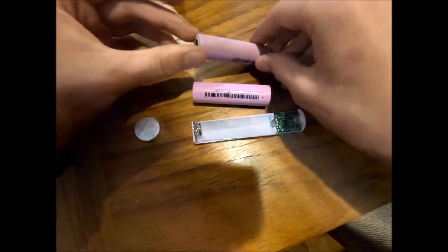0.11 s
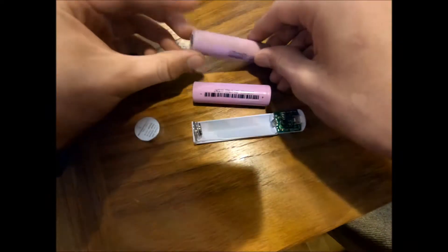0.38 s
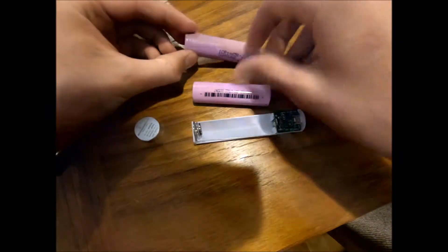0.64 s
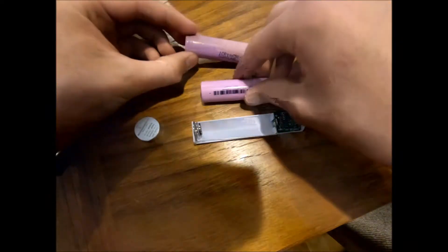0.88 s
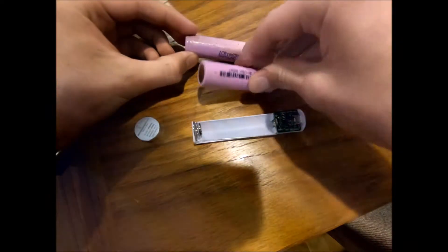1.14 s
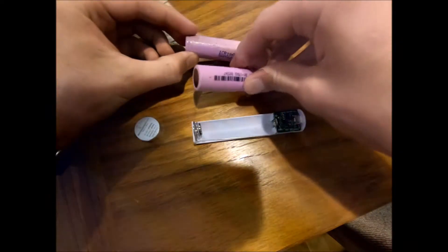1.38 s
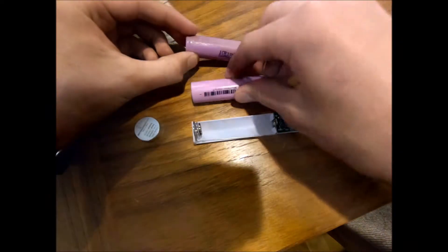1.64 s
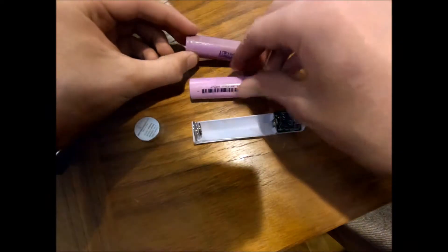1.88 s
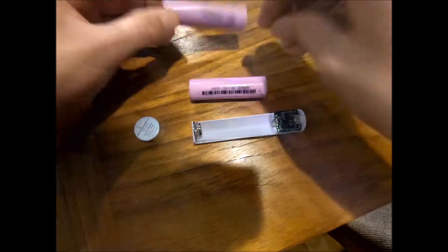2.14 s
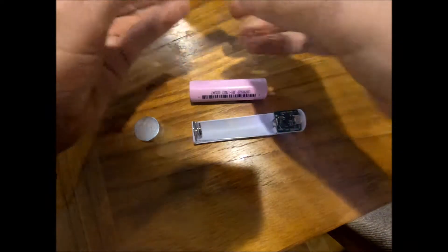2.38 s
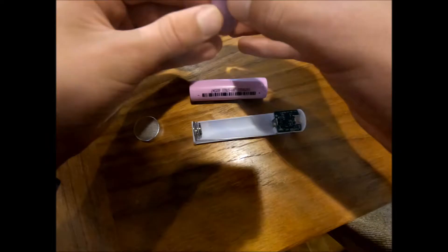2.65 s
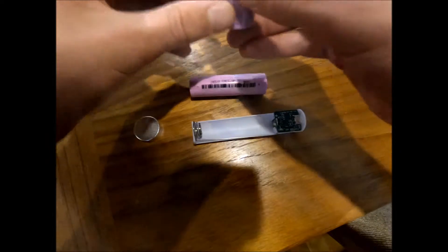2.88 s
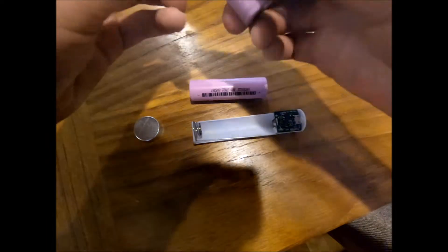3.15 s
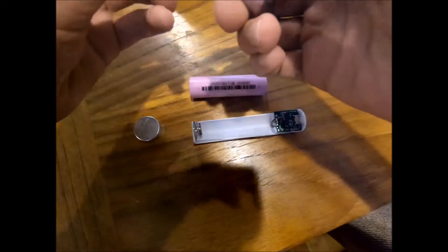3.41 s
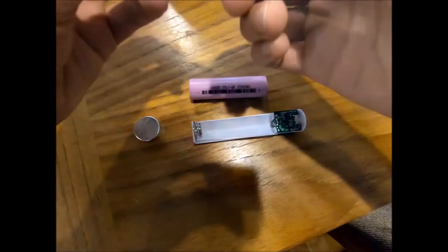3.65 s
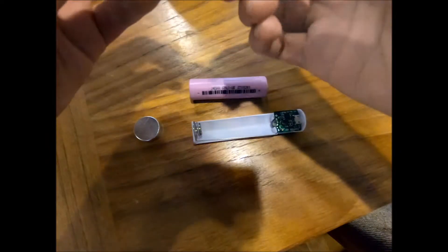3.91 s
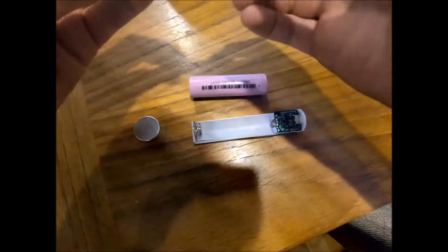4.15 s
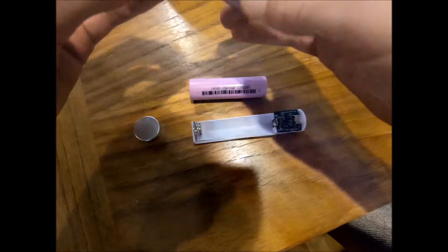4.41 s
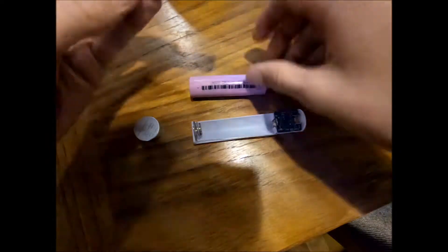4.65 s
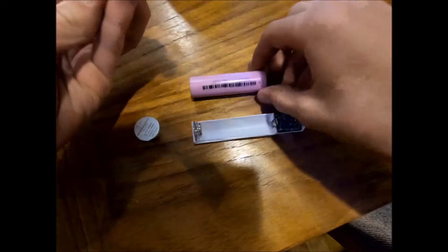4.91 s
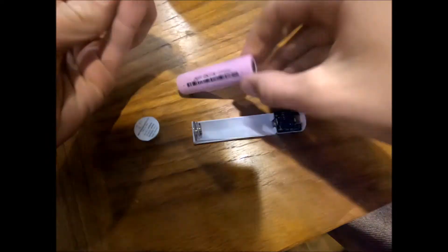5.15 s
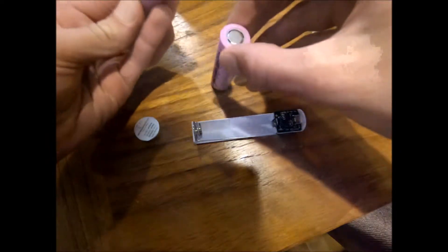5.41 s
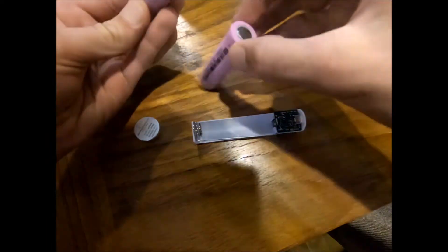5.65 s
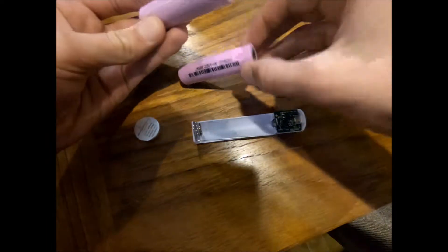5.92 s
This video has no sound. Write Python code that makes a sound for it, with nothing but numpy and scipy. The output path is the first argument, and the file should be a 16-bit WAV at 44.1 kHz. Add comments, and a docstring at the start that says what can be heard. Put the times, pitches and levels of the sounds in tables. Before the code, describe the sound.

Two hard knocks of metal cells on a wooden table, with dull bumps, skin rubbing and faint rustling between, close up in a small room.

```python
"""Metal cells handled on a wooden table

Metal cells knock on a wooden table in a small room, close to a two-port microphone on a stand.
Knocks reach both ports through the air: snap, ringing table modes, noisy clatter and a metal tick, with room echoes.
Bumps, thuds, footsteps and dragging hands shake the stand: decaying modes, tones and noise, near opposite in the ports.
Fingers rustle in grainy noise strokes, the table top drones in low noise, and microphone hiss lies under it all."""
import sys
import numpy as np
from scipy import signal
from scipy.fft import rfft, irfft
from scipy.io import wavfile
from scipy.ndimage import uniform_filter1d

SR = 44100
rng = np.random.default_rng(int(sys.argv[2]) if len(sys.argv) > 2 else 0)


def master(y):
    """Save y as 16-bit WAV."""
    cut = np.clip(np.atleast_2d(y).T, -1, 1)
    pcm = np.round(cut * 32767)  # scale
    wavfile.write(sys.argv[1], SR, pcm.astype(np.int16))


def field_ratio(decibels):
    """Amplitude ratio for a level in dB (20 dB per decade); scalars and array-likes work."""
    return 10 ** (np.asarray(decibels, dtype=float) / 20)


N = 266364
T = np.arange(N) / SR
T_HALF = T[:SR // 2]  # the first half second
MID_SIDE = np.array([[1], [-1]])  # sign of the side signal in left and right


def colour(x, points):
    """Shape a spectrum by (Hz, dB) points, interpolated over log frequency."""
    hz, db = np.transpose(points)
    f = np.maximum(np.fft.rfftfreq(N, 1 / SR), 1)
    gain = field_ratio(np.interp(np.log(f), np.log(hz), db))
    return irfft(rfft(x) * gain, N)


def noise(points, channels=1):
    """Coloured noise of rms 1."""
    x = colour(rng.standard_normal((channels, N)), points)
    return x / x.std()


def walk(rate_hz):
    """Random levels held 1 / rate s and slewed twice; spread near 1."""
    k = int(SR / rate_hz)
    held = np.repeat(rng.standard_normal(N // k + 1), k)
    return 1.3 * uniform_filter1d(uniform_filter1d(held, k), k)[:N]


def add(track, s, sound):
    """Mix a sound into a track at s seconds."""
    i = int(s * SR)
    track[..., i:i + sound.shape[-1]] += sound[..., :N - i]


def decay(t60_s):
    """Exponential decay by 60 dB in t60_s."""
    return np.exp(-np.log(1000) * T_HALF / t60_s)


def ring(hz, t60_s, phase=0.):
    """One decaying mode."""
    return decay(t60_s) * np.sin(2 * np.pi * hz * T_HALF + phase)


def hums(table, edge_cycles, rough_db, waver, skirt_rad, rough_hz=60):
    """Tones swell, hold unevenly and fade over a few cycles; pitch drift and phase wobble blur them."""
    out = np.zeros(N)
    drift, slip_rad = 1 + waver * walk(40), skirt_rad * walk(300)
    roughs = [field_ratio(rough_db * walk(rough_hz)) for _ in range(3)]  # neighbouring tones flicker apart
    for k, ((s, length_s, hz, db), turn) in enumerate(zip(table, rng.random(len(table)))):
        edge_s = edge_cycles / hz
        i = max(int((s - 2 * edge_s) * SR), 0)
        t = T[i:i + int((length_s + 6 * edge_s) * SR)]
        span = slice(i, i + len(t))
        before = np.minimum(t - s - edge_s / 2, 0) / edge_s
        after = np.maximum(t - s - length_s + edge_s / 2, 0) / (2.1 * edge_s)
        shape = np.exp(-before ** 2 - after ** 2)
        cycles = np.cumsum(hz * drift[span]) / SR + turn
        tone = np.sin(2 * np.pi * cycles + slip_rad[span])
        out[span] += field_ratio(db) * shape * tone * roughs[k % len(roughs)][span]
    return out


# Microphone hiss spectrum. Each row: frequency in Hz, relative density in dB per Hz.
HISS_SPECTRUM = [(12, -36.5), (20, -0.5), (40, 0.5), (96, -22), (156, 1.5), (262, -15.5), (400, -18.5),
                 (800, -17.5), (1250, -23.5), (1900, -28), (2800, -33), (4500, -36.5), (7000, -34),
                 (8200, -37.5), (12000, -39), (15700, -48.5)]


def hiss(level_db=-64.5):
    """Steady coloured noise, independent in the two ports."""
    return field_ratio(level_db) * noise(HISS_SPECTRUM, channels=2)


# Hands dragging on the table. Each row: time in seconds, level in dB ahead of the drag gain.
HAND_DRAG = [(0, -70.5), (.5, -66), (.72, -67.5), (1.2, -64), (1.65, -59), (1.95, -66), (2.14, -60.5),
             (2.3, -69.5), (2.7, -83.5), (3.15, -62.5), (3.3, -70.5), (3.9, -70), (4.17, -62), (4.4, -66.5),
             (4.9, -65.5), (5.2, -62), (5.4, -63.5), (5.55, -65.5), (5.78, -71), (5.95, -57), (6.04, -66)]
# Stand tremor spectrum. Each row: frequency in Hz, relative density in dB per Hz.
RUMBLE_SPECTRUM = [(12, -34.5), (20, -14), (65, -10.5), (100, -22.5), (155, -8.5), (216, -13.5),
                   (310, -11.5), (350, -2.5), (430, -5), (520, -10.5), (610, -6), (850, -3.5),
                   (1100, -20.5), (1800, -23.5), (3350, -54.5), (9000, -90.5)]


def rumble(steady_db=-72, drag_gain_db=6):
    """The stand never rests: a steady tremor plus the drag of hands, both flickering."""
    drag_db = np.interp(T, *np.transpose(HAND_DRAG)) + drag_gain_db + 2.5 * walk(25)
    steady = field_ratio(steady_db + 1.1 * walk(24)) * noise(RUMBLE_SPECTRUM)[0]
    return steady + field_ratio(drag_db) * noise(RUMBLE_SPECTRUM)[0]


# Table top drone spectrum. Each row: frequency in Hz, relative density in dB per Hz.
DRONE_SPECTRUM = [(60, -20), (110, -3), (160, 0.), (230, -3), (330, -10), (500, -30), (1000, -46),
                  (8000, -95)]
# Blows and leaning hands. Each row: time in seconds, rise in seconds, hold in seconds, level in dB.
HAND_LEANS = [(0.544, .004, 0.013, -44.5), (1.674, .002, 0.024, -36), (1.984, .008, .02, -55.5),
              (2.062, 0.015, 0.035, -56), (2.166, .02, .01, -58.5), (2.598, .03, 0.0093, -68),
              (2.913, 0.028, 0.037, -64.5), (3.138, .004, 0.0084, -67), (3.736, .03, 0.0072, -64),
              (3.998, .002, 0.0092, -38), (4.155, .03, 0.031, -58), (4.967, 0.0085, 0.024, -60),
              (5.27, .03, .08, -47.5), (5.407, .015, 0.024, -40), (5.753, .002, .045, -31.5),
              (5.96, .03, 0.04, -52.5)]


def drone(rest_db=-66, fall_db_per_s=249.5, right_db=2.5):
    """The table top drones under blows and leaning hands, differently at each port."""
    size = field_ratio(rest_db)
    for s, rise_s, hold_s, db in HAND_LEANS:
        rise = np.exp(-(np.maximum(s - T, 0) / rise_s) ** 2)
        fall = field_ratio(db - fall_db_per_s * np.maximum(T - s - hold_s, 0))
        size = size + fall * rise
    flicker = field_ratio(2. * walk(30))
    return size * flicker * noise(DRONE_SPECTRUM, channels=2) * field_ratio(np.array([[0], [right_db]]))


# Footsteps nearby, felt through the floor. Each row: time in seconds, level in dB.
FOOTSTEPS = [(1.345, -49), (2.807, -38), (3.292, -44), (3.785, -31.5), (4.278, -45), (4.757, -40.5),
             (5.25, -39), (5.728, -49)]
# Wrists and knuckles on the table. Each row: time in seconds, level in dB.
WRIST_THUDS = [(0.568, -61.5), (1.684, -49.5), (2.038, -53), (2.101, -52), (2.179, -44.5), (4.08, -29),
               (5.285, -44), (5.393, -51.5), (5.442, -40), (5.805, -45)]


def thuds(step_hz=66, step_s=.036, rebound_s=.068, rebound_db=-10, wrist_hz=73.6, wrist_s=.03):
    """Every step thuds and rebounds at the floor's pitch; wrists thud shorter and a little higher."""
    steps = [(s, step_s, step_hz, db) for s, db in FOOTSTEPS]
    rebounds = [(s + rebound_s, step_s, step_hz, db + rebound_db) for s, db in FOOTSTEPS]
    wrists = [(s, wrist_s, wrist_hz, db) for s, db in WRIST_THUDS]
    return hums(steps + rebounds + wrists, edge_cycles=0.61, rough_db=1.0, waver=0.017, skirt_rad=.05)


# Longer drags of skin. Each row: start in seconds, length in seconds, frequency in Hz, level in dB.
SKIN_DRAGS = [(.82, 0.064, 763, -50.5), (.78, .2, 440, -55.5), (.87, .11, 518.6, -50.5),
              (1.12, 0.62, 594.4, -56.5), (1.2, 0.59, 429.7, -50.5), (1.75, 0.1, 440, -50),
              (1.98, .25, 443, -53.5), (3.5, .16, 420, -53.5), (4.2, 0.121, 437, -53),
              (4.99, 0.14, 468, -56.5), (5.24, 0.11, 469, -46), (5.38, 0.074, 462.5, -43),
              (5.86, 0.11, 481, -41), (5.9, .07, 597, -47.5)]


def drags():
    """The stand sings on and off as skin sticks and slips: rough tones with blurred pitch."""
    return hums(SKIN_DRAGS, edge_cycles=6.0, rough_db=3.7, waver=.035, skirt_rad=1.03, rough_hz=28)


# Jerks of a hand or cell. Each row: start in seconds, length in seconds, frequency in Hz, level in dB.
STAND_SHUDDERS = [(0.376, 0.089, 160, -55.5), (0.55, 0.145, 170, -42), (0.948, 0.035, 481, -42),
                  (1.05, 0.023, 660, -45), (1.71, 0.12, 167, -41.5), (2.045, 0.023, 199, -35),
                  (2.089, 0.03, 628, -43), (2.09, 0.036, 202, -41), (2.165, 0.028, 210, -42),
                  (3.143, 0.038, 193, -49), (3.607, 0.062, 641, -46), (4.982, 0.016, 227, -45),
                  (5.113, 0.047, 472, -44), (5.273, 0.065, 199, -39.5), (5.317, 0.07, 170.5, -43),
                  (5.431, 0.038, 199, -33), (5.551, 0.017, 193, -46.5), (5.774, 0.08, 480, -19.5),
                  (5.784, 0.029, 244, -31), (5.83, 0.062, 215, -34), (5.988, 0.029, 230, -44)]


def shudders():
    """The stand hums briefly when a hand or cell jerks on the table."""
    return hums(STAND_SHUDDERS, edge_cycles=3.0, rough_db=0.84, waver=.015, skirt_rad=0.53)


# Jolts to the stand. Each row: time in seconds, then sway, frame, clamp and rattle levels in dB.
STAND_BUMPS = [(0.544, -69, -47, -48, -90), (1.679, -37, -33.5, -54, -69.5), (3.1465, -85, -58.5, -30, -52),
               (3.263, -87.5, -56.5, -36, -69.5), (3.5366, -86.5, -75, -23, -52.5),
               (3.984, -58.5, -60, -36.5, -61), (3.9955, -11, -27.5, -9, -34.5),
               (4.0048, -49, -48.5, -13, -49.5), (4.022, -46.5, -55, -24.5, -52.5),
               (4.956, -52, -51.5, -61, -71), (5.756, -22.5, -30.5, -38.5, -48)]
# Stand modes. Each row: part (0 sway, 1 frame, 2 clamp, 3 rattle), frequency in Hz, relative level in dB,
# t60 in seconds.
STAND_MODES = [(0, 64, -10, 0.34), (0, 84, -1.5, .25), (1, 122.3, -3, 0.25), (1, 166, -1, 0.35),
               (1, 200, -10, .15), (1, 262, -9, .2), (2, 415, 0.5, .05), (2, 426, -9.5, .14),
               (2, 372, -8, .06), (2, 463, -16.5, 0.13), (2, 340, -6, .05), (2, 584, -9.5, .04),
               (2, 700, -15.5, .05), (2, 870, -22.5, 0.1), (3, 1030, -4.5, 0.11), (3, 1530, 2.5, 0.05),
               (3, 1860, 7, 0.034), (3, 2640, -6.5, 0.018), (3, 3600, -28, 0.016)]


def bumps(rise_cycles=1.1, rough_db=.35):
    """Each jolt rings all parts of the stand; modes take a cycle or two to swing up, loose parts ring unevenly."""
    out = np.zeros(N)
    uneven = [field_ratio(rough_db * part ** 2 * walk(200)[:len(T_HALF)]) for part, *_ in STAND_MODES]
    for s, *parts_db in STAND_BUMPS:
        for (part, hz, db, t60_s), rough in zip(STAND_MODES, uneven):
            swing_up = 1 - np.exp(-(T_HALF * hz / rise_cycles) ** 2)
            add(out, s, field_ratio(parts_db[part] + db) * ring(hz, t60_s) * rough * swing_up)
    return out


# Port response to a shake. Each row: frequency in Hz, left minus right in dB, lead of the right in radians.
PORT_RESPONSE = [(40, -2, 2.7), (70, -4, 2.7), (110, -2, 3.0), (165, -2, 2.9), (230, -5, 2.95),
                 (320, 3, 3.6), (450, 6, 3.0), (630, 2.5, 2.9), (900, 2.5, 2.7), (1800, 1, 2.6)]


def ports(shake):
    """A shake of the stand moves the two ports nearly in opposition."""
    hz, db, lead_rad = np.transpose(PORT_RESPONSE)
    f = np.log(np.maximum(np.fft.rfftfreq(N, 1 / SR), 1))
    db, lead_rad = np.interp(f, np.log(hz), db), np.interp(f, np.log(hz), lead_rad)
    response = np.array([field_ratio(db / 2), field_ratio(-db / 2) * np.exp(1j * lead_rad)])
    return irfft(rfft(shake) * response, N)


# Finger strokes. Each row: peak time in seconds, rise in seconds, fall in seconds, dull level in dB,
# treble level in dB.
FINGER_STROKES = [(0.089, 0.008, 0.036, -72, -99), (0.837, 0.0051, 0.1, -62.5, -84.5),
                  (1.35, 0.11, 0.078, -67, -102), (2.06, 0.064, 0.1, -62.5, -85),
                  (2.096, 0.0097, 0.021, -60, -80), (2.201, 0.043, 0.1, -69, -89),
                  (3.148, .004, 0.033, -72, -79), (3.549, 0.069, 0.12, -67, -86.5),
                  (4.951, .008, 0.015, -65, -81), (5.262, 0.034, 0.039, -62.5, -81),
                  (5.31, 0.031, 0.11, -64, -85.5)]
# Dull rustle spectrum. Each row: frequency in Hz, relative density in dB per Hz.
RUSTLE_SPECTRUM = [(300, -0.5), (800, -3.5), (2000, -13.5), (3500, -23), (8000, -58)]
# Treble spectrum of rustles and knocks. Each row: frequency in Hz, relative density in dB per Hz.
SIZZLE_SPECTRUM = [(2500, -13.5), (4000, 8), (5200, 5.5), (7500, -0.5), (9000, -18), (15000, -38.5)]


def rustle(grain_db=2.5, wide=0.68):
    """Skin sliding on the cells' sleeves: grainy noise through the air."""
    dull, bright = 0, 0
    for s, rise_s, fall_s, db, treble_db in FINGER_STROKES:
        stroke = np.exp(-((T - s) / np.where(T < s, rise_s, fall_s)) ** 2)
        dull = dull + field_ratio(db) * stroke
        bright = bright + field_ratio(treble_db) * stroke
    strokes = noise(RUSTLE_SPECTRUM, channels=2) * dull + noise(SIZZLE_SPECTRUM, channels=2) * bright
    mid, side = strokes * field_ratio(grain_db * walk(150))
    return mid + wide * side * MID_SIDE


# Room echo bands. Each row: centre in Hz, t60 in seconds, relative level in dB.
ROOM_BANDS = [(250, 0.4, 5), (700, .33, 0.5), (1500, 0.45, -1), (2900, 0.62, -6.5), (5330, 0.43, -1.5),
              (10000, 0.067, -3)]


def room(x, level_db=-14.5, gap_s=0.0068, build_s=0.035, alike=.65):
    """Dense echoes that build up and die away band by band; alike is the correlation of the ports."""
    echo = 0
    for hz, t60_s, db in ROOM_BANDS:
        mid, side = rng.standard_normal((2, SR // 2))
        pair = np.sqrt(1 + alike) * mid + np.sqrt(1 - alike) * side * MID_SIDE
        band_pass = signal.butter(2, [hz / 1.5, hz * 1.5], "bandpass", fs=SR, output="sos")
        echo = echo + field_ratio(db) * signal.sosfilt(band_pass, pair) * decay(t60_s)
    echo = echo * np.clip((T_HALF - gap_s) / build_s, 0, 1)
    unit_echo = echo / np.sqrt((echo ** 2).sum(axis=1).mean())
    return field_ratio(level_db) * signal.fftconvolve(x, unit_echo, axes=1)[:, :N]


# Cells meeting the wood, first touches and bounces. Each row: time in seconds, snap level in dB,
# contact in ms, clatter level in dB, treble level in dB.
CELL_KNOCKS = [(1.654, -37, 0.81, -38, -72), (1.6766, -14.5, 0.54, -26.5, -48.5),
               (1.6794, -13, 0.36, -34.5, -57), (1.684, -24, 0.46, -46, -60),
               (1.692, -21.5, 0.47, -41.5, -59), (5.742, -41, 0.85, -43.5, -79),
               (5.7533, -14.5, 0.89, -25, -54.5), (5.7562, -26.5, 0.55, -29, -62.5),
               (5.7662, -16, 0.94, -35, -63.5), (5.7777, -18, 0.76, -32, -62)]
# Table top modes. Each row: frequency in Hz, relative level in dB, t60 in seconds.
TABLE_MODES = [(215, -7, 0.074), (370, -13, .05), (658, -17, 0.096), (736, -13.5, 0.062), (827, -17, 0.11),
               (980, -11, .05), (1230, -17.5, 0.064), (1312, -17, .07), (1510, -22.5, 0.031),
               (1865, -6.5, .05), (2144, -14.5, .06), (2490, -6, .035), (2820, -18, .04)]
# Clatter spectrum. Each row: frequency in Hz, relative density in dB per Hz.
CLATTER_SPECTRUM = [(100, -27.5), (200, -8.5), (450, 4), (900, 0), (1500, -2.5), (2700, -3.5), (3400, -7.5),
                    (4200, -24.5), (9000, -68.5)]


def knocks(modes_db=-6.0, scatter_db=3.5, spread_rad=2.0, clatter_s=0.013, treble_s=0.01,
           tick_db=0.1, tick_hz=8400.0, low_hz=160., left_over_right_db=0.5):
    """A short push radiates a snap, rings the table top and sets off the clatter of its many small modes."""
    out = np.zeros((2, N))
    t = T_HALF
    phase = spread_rad * rng.standard_normal((len(TABLE_MODES), 2, 1))  # each port hears its own mode phases
    body, bright = noise(CLATTER_SPECTRUM, channels=2), noise(SIZZLE_SPECTRUM, channels=2)
    clatter = body[0] + 0.9 * body[1] * MID_SIDE
    treble = bright[0] + 0.7 * bright[1] * MID_SIDE
    spreading = (1 - np.exp(-t / 0.00052)) ** 2  # waves need a moment to spread over the board
    tick = np.exp(-t[:128] / 0.00017) * np.sin(2 * np.pi * tick_hz * t[:128])
    chances = rng.standard_normal((len(CELL_KNOCKS), len(TABLE_MODES)))
    for (s, db, contact_ms, clatter_db, treble_db), chance in zip(CELL_KNOCKS, chances):
        start = s - contact_ms / 1000
        push = np.exp(-4 * (T[:256] * 1000 / contact_ms - 2) ** 2)
        snap = -np.gradient(np.gradient(push))
        add(out, start, field_ratio(db) * snap / snap.max())

        top = sum(field_ratio(mode_db + scatter_db * c) * ring(hz, t60_s, p)
                  for (hz, mode_db, t60_s), c, p in zip(TABLE_MODES, chance, phase))
        pushed = signal.fftconvolve(top * spreading, [push / push.sum()], axes=1)
        add(out, start, field_ratio(db + modes_db) * pushed)

        i = min(int(s * SR), N - len(t))
        burst = clatter[:, i:i + len(t)] * spreading * np.exp(-t / clatter_s)
        softness = signal.butter(3, 1100 / contact_ms, fs=SR, output="sos")  # a longer contact is duller
        add(out, s, field_ratio(clatter_db) * signal.sosfilt(softness, burst))

        sizzle = treble[:, i:i + len(t)] * spreading * np.exp(-t / treble_s)
        add(out, start, field_ratio(treble_db) * sizzle)
        add(out, s - contact_ms / 2000, field_ratio(treble_db + tick_db) * tick)  # the metal rim touches first
    # the knocks carry no deep bass
    out = signal.sosfilt(signal.butter(2, low_hz, "highpass", fs=SR, output="sos"), out)
    return out * field_ratio(left_over_right_db * MID_SIDE / 2)


def scene():
    """Air path and stand path meet at the two ports."""
    air = knocks()
    shake = rumble() + thuds() + drags() + shudders() + bumps()
    return hiss() + drone() + ports(shake) + rustle() + room(air) + air


def top_cut(x):
    """Nothing passes above the cut-off."""
    return signal.sosfilt(signal.butter(12, 15700, fs=SR, output="sos"), x)


def record(dry):
    """Turn the finished mix into the output."""
    return top_cut(dry)


dry = scene()
out = record(dry)
master(out)
```